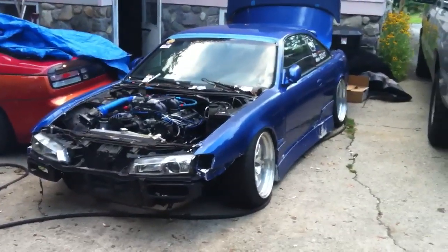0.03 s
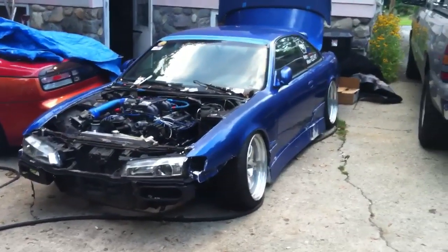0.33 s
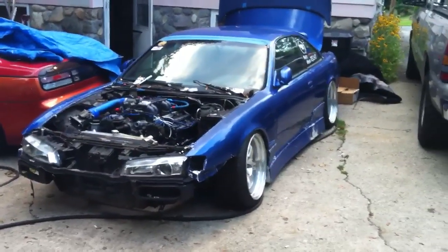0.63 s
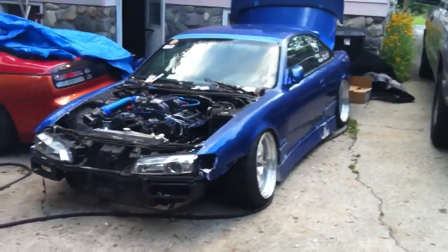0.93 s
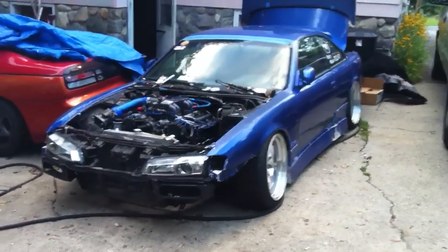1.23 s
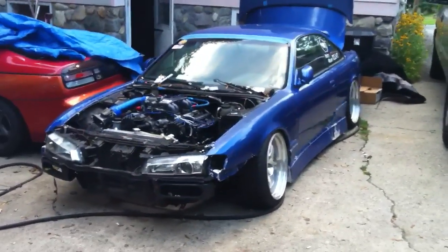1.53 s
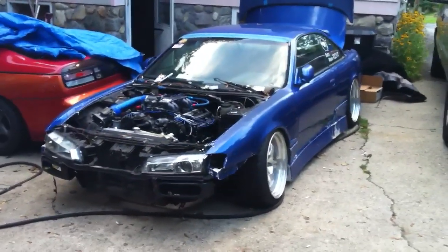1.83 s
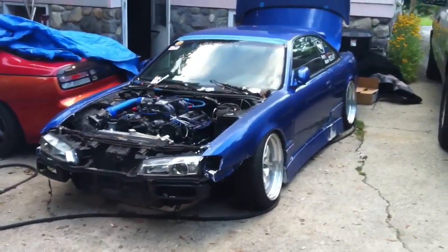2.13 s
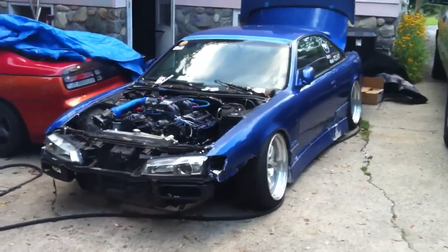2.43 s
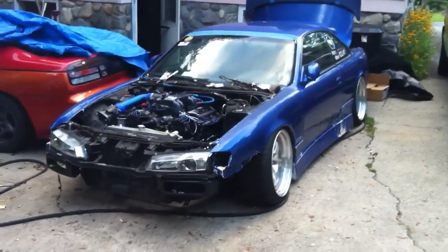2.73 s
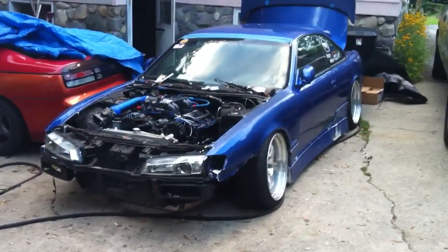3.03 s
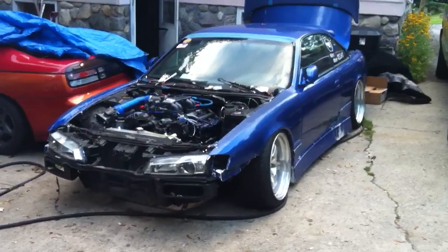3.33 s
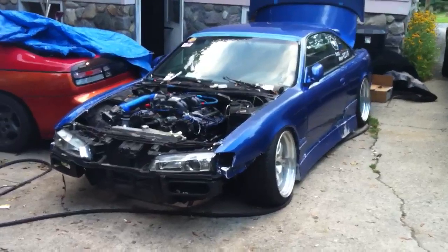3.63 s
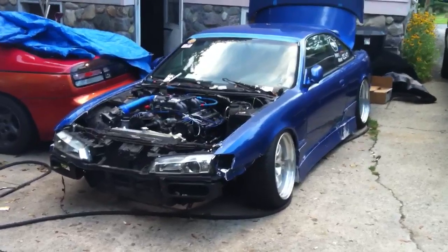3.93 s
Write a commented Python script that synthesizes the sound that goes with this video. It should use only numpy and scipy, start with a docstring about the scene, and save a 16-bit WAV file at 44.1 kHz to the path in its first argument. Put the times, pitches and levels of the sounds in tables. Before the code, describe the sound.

A car engine starts outdoors, sputtering on the starter before running loud and throbbing.

```python
"""A V8 with an open engine bay starts on a driveway. Over faint yard noise the solenoid clacks,
the starter whines and grinds, and belts and intake hiss. Single cylinders fire, booming in the
exhaust pipe and kicking against the clashing starter gear. The engine catches: the block clatters,
the pipe drones and the intake roars through the flare. It settles into a loud, loping fast idle,
eight unequal exhaust pulses a cycle, with metal parts singing and the loudest cylinders barking."""
import sys
import numpy as np
from scipy import signal
from scipy.fft import rfft, irfft, next_fast_len
from scipy.io import wavfile
from scipy.ndimage import map_coordinates

SR = 44100
rng = np.random.default_rng(int(sys.argv[2]) if len(sys.argv) > 2 else 0)


def wrap_up_sound(samples):
    """Save the sound to the file named by the first command line argument, as 16-bit audio."""
    columns = np.atleast_2d(samples).T
    # keep every value between -1 and 1, then stretch to whole-number steps
    tamed = np.clip(columns, -1, 1)
    steps = np.round(tamed * 32767).astype(np.int16)
    wavfile.write(sys.argv[1], SR, steps)


N = 176400
T = np.arange(N) / SR
RATTLE_T60_S, SETTLE_TAKES_S = 0.15, 0.28

# Four-stroke engine speed: time_s, cycles_per_s
ENGINE_SPEED = [(1.6,6),(1.9,10.5),(2.05,11.6),(2.15,12.5),(2.28,12.71),(2.38,12.64),(2.58,12.3),(2.68,12.16),(2.78,11.98),(2.98,11.88),(3.18,11.7),(3.3,11.66),(3.68,11.75),(4,11.85)]
# Exhaust pulses within one cycle: place_cycles, level_db
CYLINDER_PULSES = [(.01, 3.5), (.17, -4.5), (0.289, -6), (.40, 3.5), (.529, -4.5), (.62, -.5), (.76, -3),
                   (.89, -10)]
# Fader for belts and intake hiss: time_s, level_db
HISS_FADER = [(.6, -55), (.66, -37.5), (.75, -30.5), (.82, -32.5), (.9, -31.5), (1.1, -26.5), (1.3, -30),
              (1.6, -32.5), (1.75, -23), (1.85, -32), (1.93, -22.5), (2.06, -24), (2.15, -27.5), (2.6, -29),
              (4, -27.5)]
# Fader for uneven gas puffs in the pipe: time_s, level_db
PUFF_FADER = [(.7, -59), (.77, -41), (.83, -54), (.88, -38), (.96, -37.5), (1.1, -29.5), (1.58, -31),
              (1.66, -20), (1.79, -15), (1.89, -23), (1.99, -15.5), (2.03, -9.5), (2.12, -22.5), (4, -20.5)]
# Fader for block and valve clatter: time_s, level_db
CLATTER_FADER = [(1.6, -31.5), (1.75, -33.5), (1.87, -26.5), (1.93, -23), (2.2, -20.5), (2.6, -24.5),
                 (3.0, -23.5), (3.3, -22.5), (4, -23)]
# Fader for the exhaust note: time_s, level_db
EXHAUST_FADER = [(1.85, -19), (2.0, -11.5), (2.1, -1.5), (2.25, -1.5), (2.8, -1), (4, -0.5)]


def amp(db):
    """Decibels to gain."""
    return 10 ** (np.asarray(db) / 20)


def unit(x):
    """x at rms 1."""
    return x / np.sqrt(np.mean(x ** 2) + 1e-20)


def curve(rows):
    """(time_s, value) points joined up, one value a sample."""
    return np.interp(T, *np.transpose(rows)[:2])


def level(rows):
    """Gain from a fader (time first, dB last), silent before its first point."""
    points = np.transpose(rows)
    return amp(np.interp(T, points[0], points[-1])) * np.clip((T - rows[0][0]) / .01, 0, 1)


def wobble(rate):
    """A smooth random curve, rate knots a second."""
    return map_coordinates(rng.standard_normal(int(N * rate / SR) + 4), [T * rate])


def phase_of(hz):
    """Running phase in radians of a steady or moving pitch."""
    return 2 * np.pi * np.cumsum(hz * np.ones(N)) / SR


def noise_band(hz, width_hz):
    """Narrow noise at rms 1 around a steady or moving centre."""
    phase = phase_of(hz)
    return unit(wobble(width_hz) * np.sin(phase) + wobble(width_hz) * np.cos(phase))


def colour(x, eq):
    """x through a (freq_hz, gain_db) EQ that rolls off past both ends, at rms 1."""
    hz, db = np.transpose(eq)
    f = np.fft.rfftfreq(len(x), 1 / SR)
    gain = amp(np.interp(np.log(f + 1), np.log(hz + 1), db))
    roll_off = (1 + (hz[0] / (2 * f + 1)) ** 2) * (1 + (f / (2 * hz[-1] + 1)) ** 2)
    return unit(irfft(rfft(x) * gain / roll_off, len(x)))


def grains(rate, spread_db):
    """Random tiny impacts of uneven size, about rate a second."""
    hits = (rng.random(N) < rate / SR) * rng.choice([-1, 1], N)
    return unit(hits * amp(spread_db * np.clip(rng.standard_normal(N), -2, 2)))


def metal(hits, t60_s, ring_db):
    """Impacts with the dense ring of metal parts after them."""
    t = T[:SR // 4]
    tail = rng.standard_normal(len(t)) * amp(-60 * t / t60_s)
    return unit(hits + amp(ring_db) * signal.fftconvolve(hits, tail / np.linalg.norm(tail))[:N])


def burst(start_s, hold_s, t60_s, attack_s=0.0019):
    """Attack, hold and release envelope."""
    release = amp(-60 * np.maximum(T - start_s - hold_s, 0) / t60_s)
    return np.clip((T - start_s) / attack_s, 0, 1) * release


def engine_cycles(zero_s=3.07):
    """Running count of four-stroke cycles, passing zero at zero_s."""
    cycles = np.cumsum(curve(ENGINE_SPEED)) / SR
    return cycles - np.interp(zero_s, T, cycles)


def bump(cycles, offset, width):
    """A smooth bump once a cycle."""
    return np.exp((np.cos(2 * np.pi * (cycles - offset)) - 1) / width)


def yard():
    """A faint, steady bed of outdoor noise."""
    # Outdoor air: freq_hz, gain_db
    yard_eq = [(18, -59), (87, -18), (151, -2), (373, -8.5), (826, -1.5), (2090, -12.5), (4630, -18.5),
               (5430, -13), (6200, -21), (15300, -29)]
    return amp(-46.5) * colour(rng.standard_normal(N), yard_eq)


def solenoid():
    """The solenoid slams in with one metallic clack."""
    # Body of the clack: freq_hz, gain_db
    clack_eq = [(59, -57), (100, -28), (363, -18), (1290, -15), (1500, -0.5), (1740, -10), (2680, -23),
                (3250, -11), (7350, -12.5), (17000, -29)]
    clack = colour(metal(grains(3000, 2.5), t60_s=0.065, ring_db=6), clack_eq)
    return amp(-15.5) * clack * burst(start_s=.575, hold_s=0.003, t60_s=0.11)


def starter():
    """The gears whine, whirr and grind, slowed by each compression, and the pinion sings."""
    # Gear mesh pitch and starter fader: time_s, pitch_hz, level_db
    mesh = [(.58, 1250, -26), (.62, 1200, -27), (.67, 1100, -25), (.73, 1260, -26.5), (.77, 1140, -22),
            (.79, 1110, -24.5), (.82, 1240, -30.5), (.875, 1420, -19), (.92, 1330, -28.5), (.96, 1250, -36),
            (1.3, 1500, -52), (1.7, 1600, -54)]
    # Note of the pinion: time_s, pitch_hz
    pinion_pitch = [(.6, 1970), (.69, 2220), (.87, 2160), (.92, 2080)]
    # Resonances of the starter housing: freq_hz, gain_db
    housing_eq = [(88, -48), (150, -12), (320, -10.5), (600, -23), (720, -6.5), (1130, -14.5), (1410, -2.5),
                  (1600, -10), (2150, -4.5), (2420, -16), (3390, -7), (4910, -22), (7800, -15),
                  (13200, -120)]
    teeth = phase_of(curve(mesh) * (1 + .03 * wobble(250)))
    whine = (amp(-6) * np.sin(teeth) + amp(-19) * np.sin(2 * teeth)) * amp(2.1 * wobble(70))
    whirr = amp(-5.5) * noise_band(curve(mesh), width_hz=380)
    pinion_gain = amp(-17 + 4.6 * wobble(42))
    pinion = pinion_gain * np.sin(phase_of(curve(pinion_pitch) * (1 + .014 * wobble(120))))
    grind = amp(-2) * colour(metal(grains(1800, 4.8), t60_s=0.077, ring_db=5), housing_eq)
    # The gears bite harder at one compression.
    bite = burst(start_s=.867, hold_s=0.018, t60_s=RATTLE_T60_S) * colour(grains(830, 3), housing_eq)
    return level(mesh) * (whine + whirr + pinion + grind) + amp(-29.5) * bite


def hiss(cycles):
    """Belts and intake hiss, with sixteen valve ticks a cycle coming through."""
    # Bright, peaky air: freq_hz, gain_db
    hiss_eq = [(1000, -24), (1800, 0), (2700, -3.5), (4000, 2.5), (5100, -4.5), (6100, 3), (6450, -0.5),
               (7100, 2.5), (8200, -5.5), (9400, 0.5), (10500, -6), (12300, -3.5), (13800, -4),
               (15500, -7.5), (17500, -17)]
    air = rng.standard_normal(N) + amp(-8) * grains(2500, 5.1)
    ticks = 1 + 0.16 * bump(16 * cycles, offset=0, width=0.17)
    return level(HISS_FADER) * colour(air * ticks * amp(wobble(25.07)), hiss_eq)


def pipe_ring():
    """Uneven gas puffs keep the resonances of the exhaust pipe ringing."""
    # Pipe resonances: pitch_hz, level_db, t60_s
    pipe_modes = [(86.6, -14.5, 0.27), (133.74, 1.5, 0.16), (187.3, -5, 0.1324), (213.5, -5, 0.1504),
                  (274, -3.5, 0.1), (299.5, -3, 0.14), (402, -8, 0.0863), (472, -9, 0.0723)]
    ring = np.zeros(N)
    for hz, db, t60_s in pipe_modes:
        gain = amp(db + wobble(29.98))
        # A shorter t60 lets the phase wander faster and blurs the pitch.
        drift = np.cumsum(rng.standard_normal(N)) * np.sqrt(np.log(1e6) / t60_s / SR)
        ring += gain * np.sin(2 * np.pi * hz * T + drift)
    gas = colour(rng.standard_normal(N), [(60, -19), (110, 5), (320, -8), (520, -7.5), (700, -13)])
    return unit(unit(ring) + amp(-8) * gas)


def rumble():
    """Deep noise that follows the puffs and the exhaust."""
    # Low-end weight: freq_hz, gain_db
    rumble_eq = [(20, 3), (50, 15), (75, -13), (130, -16)]
    gain = amp(-40) * (level(PUFF_FADER) + amp(-27) * level(EXHAUST_FADER))
    return gain * colour(rng.standard_normal(N), rumble_eq)


def firings():
    """Over the running puffs, single firings boom in the pipe, rattle the block and thud."""
    # First single firings: start_s, hold_s, boom_db, rattle_db, thud_db
    shots = [(0.979, .012, -20.5, -23.5, -35), (1.013, 0.033, -25, -18, -34),
             (1.133, 0.04, -26, -20, -24.5), (1.17, 0.039, -22.5, -19, -27),
             (1.327, 0.023, -18.5, -20, -23.5), (1.419, 0.012, -31, -36, -29),
             (1.479, 0.034, -21, -18.5, -30), (1.601, .02, -32, -32, -30), (1.659, .012, -28, -17.5, -23),
             (1.7, .018, -27, -15, -29), (1.748, 0.034, -23, -20.5, -22.5),
             (1.794, 0.016, -33, -17.5, -18.5), (1.906, 0.011, -18, -22.5, -26),
             (1.94, .008, -28, -21, -22), (2.01, .015, -16, -19.5, -23), (2.054, .012, -18, -26, -26)]
    # The shaken block: freq_hz, gain_db
    rattle_eq = [(150, -29), (300, -3), (480, -9), (620, -4), (820, 0.5), (1000, 0), (1190, 3),
                 (1400, -2.5), (1700, -11.5), (3000, -12), (8000, -23)]
    # Dull body of a firing: freq_hz, gain_db
    thud_eq = [(150, -22), (250, -5), (300, 4.5), (370, -6.5), (450, 0), (600, -22), (1200, -43)]
    boom = sum(amp(db) * burst(start_s, hold_s, t60_s=0.33) for start_s, hold_s, db, _, _ in shots)
    out = np.hypot(boom, level(PUFF_FADER)) * pipe_ring()
    for start_s, hold_s, _, rattle_db, thud_db in shots:
        rattle = amp(rattle_db) * colour(metal(grains(1200, 2.9), t60_s=0.027, ring_db=0.5), rattle_eq)
        thud = amp(thud_db) * colour(grains(900, 1.7), thud_eq)
        out += burst(start_s, hold_s, RATTLE_T60_S) * (rattle + thud)
    return out


def gear_clashes(fizz_above_hz=9000):
    """The starter gear clashes as the engine kicks against it, ringing anew each time."""
    # Gear clashes: start_s, hold_s, level_db, fizz_db
    clashes = [(0.981, 0.023, -18.5, -5), (1.016, .008, -11, 0), (1.036, 0.0097, -12, -4),
               (1.112, 0.0074, -12.5, -4), (1.143, 0.038, -17, 1), (1.174, 0.039, -19.5, 0),
               (1.328, 0.033, -22, 1), (1.419, 0.011, -20, -6), (1.481, 0.031, -22.5, -1),
               (1.581, 0.0075, -18.5, -2), (1.643, 0.038, -22.5, -1), (1.704, 0.028, -19, 1),
               (1.729, 0.088, -21, -6), (1.854, .01, -20.5, 1), (1.903, .01, -26, -4)]
    # Bright clashing teeth: freq_hz, gain_db
    clash_eq = [(700, -19), (1800, -4), (2800, -6.5), (4000, -1), (6200, -1.5), (7200, 0.5), (8500, -3.5),
                (14000, -5.5), (17000, -13.5)]
    out = np.zeros(N)
    for start_s, hold_s, db, fizz_db in clashes:
        eq = [(hz, gain_db + fizz_db * (hz > fizz_above_hz)) for hz, gain_db in clash_eq]
        clash = colour(metal(grains(1300, 3.5), t60_s=.025, ring_db=2), eq)
        out += amp(db) * burst(start_s, hold_s, t60_s=0.092) * clash
    return out


def clatter(cycles):
    """The block repeats its knocks each cycle under fresh rattle, swelling per cycle and per firing."""
    # Resonances of the block: freq_hz, gain_db
    block_eq = [(350, -26), (520, -2.5), (620, -6.5), (730, 6), (810, -2.5), (890, 6.5), (1000, -8),
                (1100, 0), (1300, -4.5), (1600, -12.5), (2150, -15.5), (2700, -20.5), (5000, -23.5)]
    pattern = rng.choice([-1., 1.], SR // 12)
    repeated = map_coordinates(pattern, [cycles % 1 * len(pattern)], mode="grid-wrap")
    knocks = colour(repeated + rng.standard_normal(N), block_eq)
    cycle_swell = 1 + .6 * bump(cycles, offset=.52, width=1)
    firing_swell = 1 + 0.36 * bump(len(CYLINDER_PULSES) * cycles, offset=0.64, width=0.96)
    return level(CLATTER_FADER) * unit(knocks * cycle_swell * firing_swell)


def pipe_drone():
    """The lowest strong resonance of the pipe, rising as hot gas fills it."""
    # Drone as the engine catches: time_s, pitch_hz, level_db
    glide = [(1.62, 118, -38), (1.70, 122.4, -26), (1.86, 132.5, -15), (1.95, 134.6, -29),
             (2.0, 137.6, -26), (2.035, 139, -12), (2.09, 144, -19), (2.16, 150, -42), (2.3, 153, -90)]
    hz = curve(glide) * (1 + 0.029 * wobble(39.76))
    return np.sqrt(2) * level(glide) * amp(1.9 * wobble(44.4)) * np.sin(phase_of(hz))


def exhaust(cycles, settle_s=2.64):
    """Eight unequal pulses make a loping stack of orders; the strongest throbs in the muffler."""
    # Exhaust harmonics: multiple_of_cycle_rate, flare_db, idle_db
    orders = [(8, -23, -22), (10, -32, -28.5), (12, -30, -23), (13, -28.5, -21), (14, -33, -26),
              (15, -20, -27), (16, -21.5, -27.5), (17, -25, -23.5), (18, -22.5, -28), (19, -40, -27.5),
              (20, -25.5, -57), (22, -25.5, -23.5), (23, -32, -25.5), (24, -28.5, -63), (25, -35, -27),
              (26, -26, -34), (27, -24, -24.5), (28, -28, -23), (29, -41, -24.5), (30, -28.5, -36),
              (31, -60, -29), (32, -44, -30.5), (33, -28.5, -34), (34, -36, -33.5), (35, -32, -29),
              (36, -37, -37), (37, -37, -29.5), (38, -48, -37.5), (39, -33, -52), (40, -55, -33),
              (41, -51, -31), (42, -37.5, -34)]
    # Muffler chambers that smear each pulse: centre_hz, width_hz
    chambers = [(140, 83), (215, 136)]
    # Swell of the falling note as it passes a pipe resonance: time_s, gain_db
    note_swell = [(2.4, -4), (2.68, 2.5), (2.95, -2)]
    note_hz, note_width_hz = 186, 16
    throb_hz, throb_width_hz, throb_place = 335, 45, .04
    place, pulse_db = np.transpose(CYLINDER_PULSES)
    settled = np.clip((T - settle_s) / SETTLE_TAKES_S, 0, 1)
    throb_gain = amp(19 - 1.5 * (1 - settled))
    out = np.zeros(N)
    for order, flare_db, idle_db in orders:
        idle_hz = order * ENGINE_SPEED[-1][1]
        # Pulses, muffler and throb set only the phase of each order, which shapes the lope.
        muffler = np.prod([1j * idle_hz * width / (centre ** 2 - idle_hz ** 2 + 1j * idle_hz * width)
                           for centre, width in chambers])
        pulses = muffler / abs(muffler) * np.sum(amp(pulse_db) * np.exp(-2j * np.pi * order * place))
        throb_band = np.exp(-((idle_hz - throb_hz) / throb_width_hz) ** 2)
        throb = throb_gain * throb_band * np.exp(-2j * np.pi * order * throb_place)
        db = flare_db + (idle_db - flare_db) * settled + 1.5 * wobble(9)
        db += curve(note_swell) * np.exp(-((idle_hz - note_hz) / note_width_hz) ** 2)
        out += np.sqrt(2) * amp(db) * np.cos(2 * np.pi * order * cycles + np.angle(pulses - throb))
    return level(EXHAUST_FADER) * out


def intake_roar(cycles):
    """The intake gulps air for each cylinder while the engine flares."""
    # Fader for the roar: time_s, level_db
    roar_fader = [(1.88, -37), (1.96, -29), (2.3, -28), (2.8, -45)]
    # Throat of the intake: freq_hz, gain_db
    roar_eq = [(700, -20), (950, -0.5), (1100, 5.5), (1350, -3), (1600, -9), (2500, -30)]
    gulps = 1 + .5 * np.cos(2 * np.pi * len(CYLINDER_PULSES) * cycles)
    return level(roar_fader) * colour(gulps * rng.standard_normal(N), roar_eq)


def singing_metal(start_s=2.18):
    """Pulleys and engine bay parts ring with the running engine, riding the hiss fader."""
    # Narrow rings: pitch_hz, width_hz, level_db
    rings = [(2140, 200, -15), (6090, 120, -13.5), (7150, 110, -14.5)]
    fade_in = np.clip((T - start_s) / SETTLE_TAKES_S, 0, 1)
    return fade_in * level(HISS_FADER) * sum(amp(db) * noise_band(hz, width) for hz, width, db in rings)


def barks(cycles, start_s=2.35, grow_s=.6):
    """The loudest cylinders bark at the same places in every cycle, growing as the idle settles."""
    # Barks riding the clatter fader: place_cycles, length_cycles, pitch_hz, width_hz, level_db
    bark_pattern = [(.03, .025, 760, 400, 0), (.09, .035, 1250, 500, -1), (.45, .03, 1120, 450, 2),
                    (.595, .02, 880, 600, 5), (.665, .018, 780, 400, 4)]
    out = np.zeros(N)
    for place, length, hz, width_hz, db in bark_pattern:
        distance = (cycles - place + .5) % 1 - .5
        out += amp(db) * np.exp(-(distance / length) ** 2 / 2) * noise_band(hz, width_hz)
    fade_in = np.clip((T - start_s) / grow_s, 0, 1)
    return amp(-1) * fade_in * level(CLATTER_FADER) * out


def scene():
    """The start-up, the running engine and the yard, mixed in mono."""
    cycles = engine_cycles()
    start_up = solenoid() + starter() + firings() + gear_clashes() + pipe_drone()
    engine = exhaust(cycles) + clatter(cycles) + barks(cycles) + intake_roar(cycles)
    return (start_up + engine + hiss(cycles) + singing_metal() + rumble() + yard())[None]


def record(dry, low_cut_hz=66, top_hz=17700):
    """The microphone thins the deep bass, rounds off peaks at full scale and cuts the very top."""
    size = next_fast_len(N + SR // 2)
    f = np.fft.rfftfreq(size, 1 / SR)
    low_shelf = .2 + .8 * f ** 8 / (f ** 8 + low_cut_hz ** 8.)
    thinned = irfft(rfft(dry, size) * low_shelf, size)[..., :N]
    rounded = thinned / (1 + np.abs(thinned) ** 8) ** (1 / 8)
    return irfft(rfft(rounded, size) * (f < top_hz), size)[..., :N]


dry = scene()
out = record(dry)
wrap_up_sound(out)
```